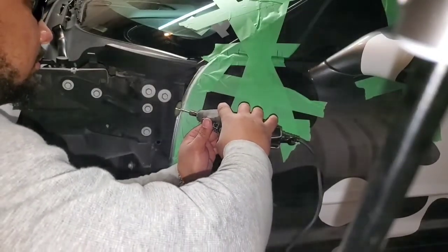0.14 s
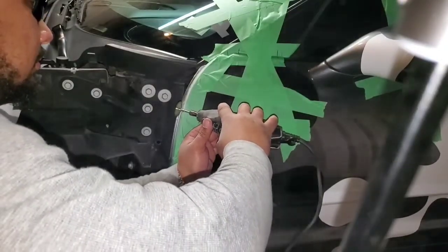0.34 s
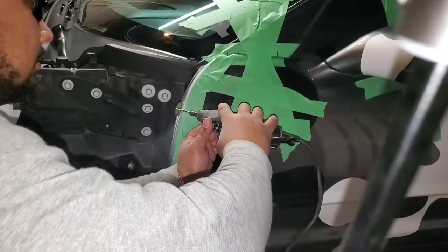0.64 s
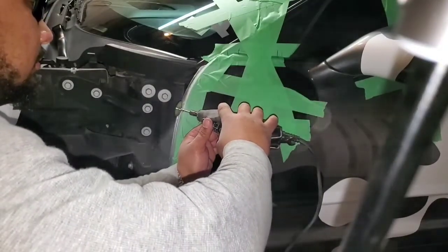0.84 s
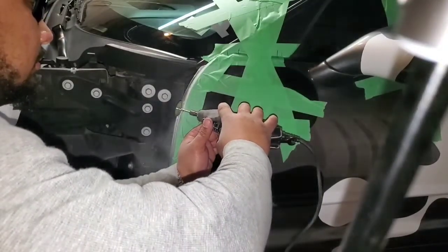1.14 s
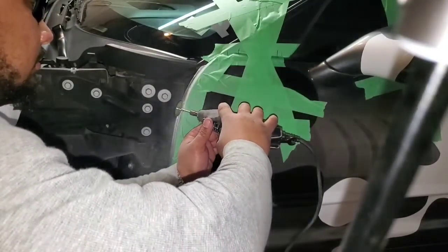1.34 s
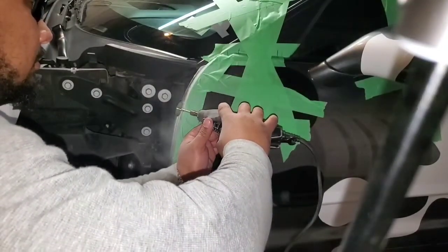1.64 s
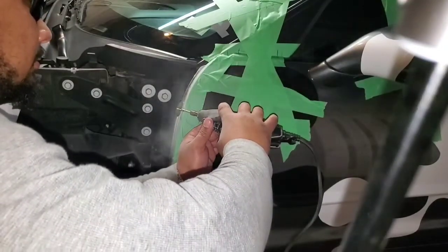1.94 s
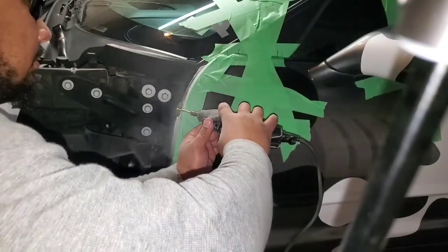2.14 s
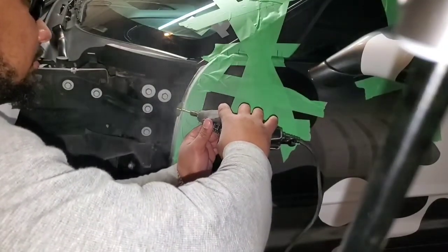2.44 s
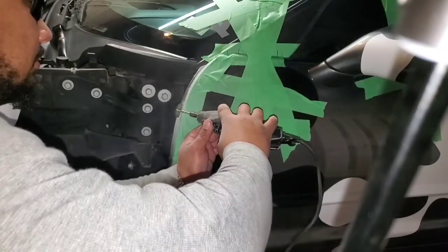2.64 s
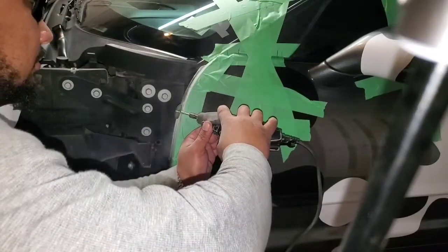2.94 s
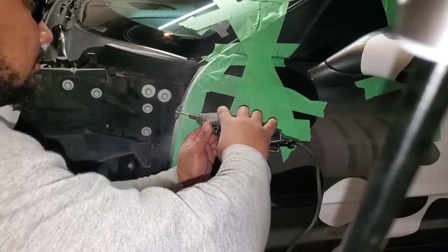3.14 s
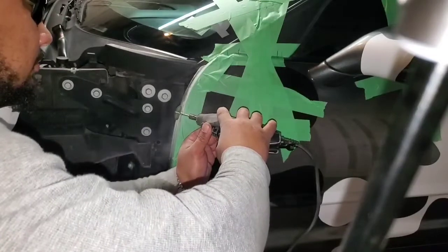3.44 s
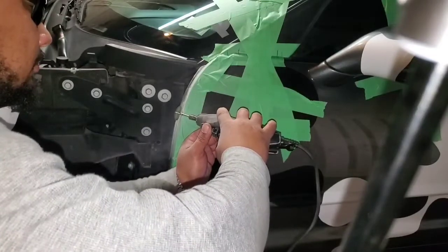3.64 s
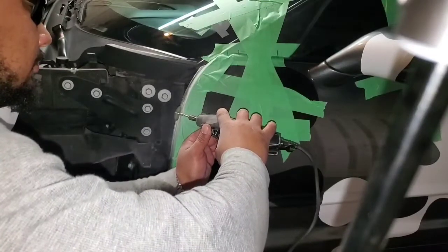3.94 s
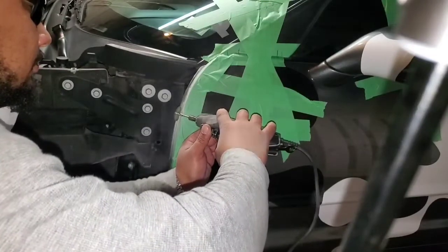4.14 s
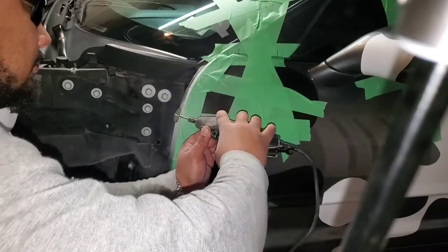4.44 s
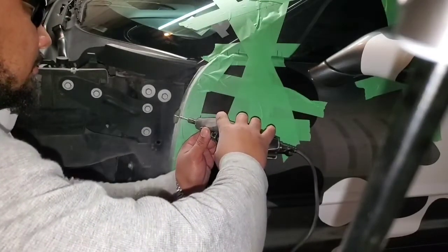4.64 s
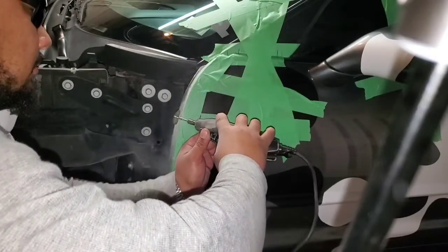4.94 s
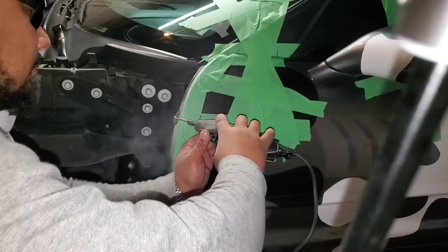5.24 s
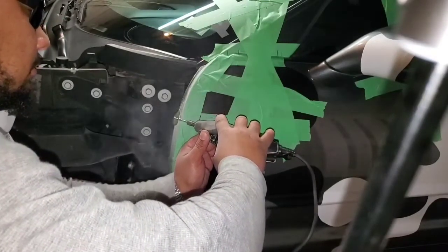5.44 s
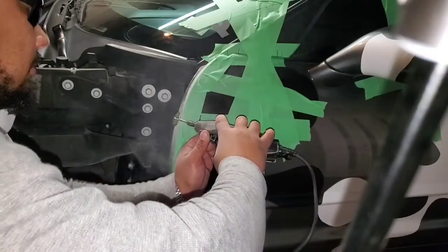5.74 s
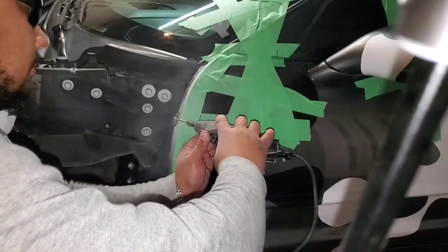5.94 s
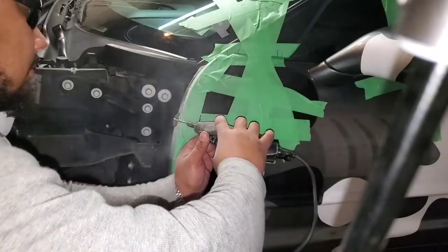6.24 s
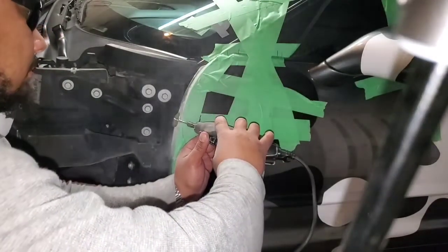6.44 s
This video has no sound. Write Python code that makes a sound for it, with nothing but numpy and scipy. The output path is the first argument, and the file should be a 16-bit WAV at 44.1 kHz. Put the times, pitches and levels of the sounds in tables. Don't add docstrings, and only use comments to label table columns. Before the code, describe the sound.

A corded rotary tool runs throughout, close in a garage, its cutoff disc working a car panel. At 0 s it is fast, a hard buzzing whine with strong rapid knocking that blurs into a rough tone. From about 0.7 s the pitch slides down steeply, and between 1.2 and 2.2 s it is a low, laboured growl with loud bright grit and ringing metal. Around 2.3 s the rasp eases and the pitch climbs, peaking near 2.9 s. At 3.4 s the disc bites again, rasping loudly at the lowest pitch until 4.4 s. It frees and rises near 4.8 s, sags with moderate rasp from 5.1 to 5.7 s, then lightens and rises to about 6.3 s before falling with a last snag at 6.5 s. Steady vent hiss, faint rumble, short reflections and momentary bass losses accompany it.

```python
import sys
import numpy as np
from scipy import signal
from scipy.fft import rfft, irfft, next_fast_len
from scipy.io import wavfile
from scipy.ndimage import uniform_filter1d, minimum_filter1d

SR = 44100
rng = np.random.default_rng(int(sys.argv[2]) if len(sys.argv) > 2 else 0)


def field_ratio(decibels):
    return 10 ** (np.asarray(decibels, dtype=float) / 20)


def to_wav(sig):
    pcm = np.clip(np.atleast_2d(sig), -1, 1) * 32767
    pcm = np.round(pcm).astype(np.int16)
    wavfile.write(sys.argv[1], SR, pcm.T)


N = 290178
MAINS_HZ = 120
USUAL_DB = -28


def unit(x):
    return x / np.sqrt(np.mean(x ** 2) + 1e-20)


def along(points, hz):
    point_hz, value = np.transpose(points)
    return np.interp(np.log(hz + 1), np.log(point_hz + 1), value)


def curve(points):
    point_s, value = np.transpose(points)
    return np.interp(np.arange(N) / SR, point_s, value)


def wobble(rate_hz):
    knots = rng.standard_normal(1000)
    return np.interp(np.arange(N) * rate_hz / SR, np.arange(len(knots)), knots)


def bumps(rows):
    seconds = np.arange(N) / SR
    return sum(size * np.clip(1 - np.abs(seconds - s) / half_s, 0, 1) for s, half_s, size in rows)


def filtered(x, response):
    m = next_fast_len(N + SR // 2)
    return irfft(rfft(x, m) * response(np.fft.rfftfreq(m, 1 / SR)), m)[..., :N]


def above(hz, edge_hz):
    return 1 / np.sqrt(1 + (edge_hz / (hz + 1)) ** 24)


def band(x, lo_hz, hi_hz):
    return unit(filtered(x, lambda hz: above(hz, lo_hz) * np.sqrt(1 - above(hz, hi_hz) ** 2)))


def ringing(modes, hz):
    resonances = 0
    for mode_hz, width_hz, level_db in modes:
        damping = 1j * hz * width_hz
        resonances = resonances + field_ratio(level_db) * damping / (mode_hz ** 2 - hz ** 2 + damping)
    return 1 + np.abs(resonances)


# time_s, speed_hz (turns per second)
SHAFT_SPEED = [(0.0, 500.4), (0.42, 487.8), (0.74, 464.2), (1.3, 320.9), (1.67, 291.6), (2.0, 287.9),
               (2.54, 295.6), (2.87, 332.6), (3.33, 308.6), (3.5, 275.9), (3.86, 262.4), (4.37, 262.3),
               (4.49, 292.3), (4.81, 309.7), (5.21, 275.1), (5.57, 275.8), (6.28, 344.6), (6.58, 272.8)]
# centre_s, half_length_s, speed_change_hz
SHAFT_CATCHES = [
    (.98, .09, -6),
    (1.32, .05, -3),
    (1.65, .07, -3),
    (2.45, .06, 4),
    (2.56, .08, -8),
    (2.72, .07, 4),
    (3.27, .05, -3),
    (6.08, .07, 3.5),
    (6.27, .06, -2),
    (6.42, .08, 2.5),
]


def shaft():
    inertia_s = .26
    return uniform_filter1d(curve(SHAFT_SPEED), int(inertia_s * SR), mode="nearest") + bumps(SHAFT_CATCHES)


def braking(speed):
    smooth = uniform_filter1d(speed, SR // 10, mode="nearest")
    return np.clip(-np.gradient(smooth) * SR / speed, 0, 1)


# start_s, end_s, order, level_db
FAVOURED_ORDERS = [(0.13, .6, 10, 6), (0.083, 0.41, 9, -20), (0.69, 0.78, 6, 3.5), (0.066, .5, 5, -6),
                   (0.67, 0.775, 3, 6), (0.41, 0.43, 4, 4), (0.69, .95, 5, -19), (0.98, 1.13, 13, 9),
                   (1.2, 1.6, 8, -14), (1.72, 1.96, 2, -9.5), (2.6, 3, 6, 8), (3.1, 3.18, 3, -18),
                   (1.9, 3.2, 11, -9), (3.25, 3.5, 9, 8), (3, 3.47, 10, 4.5), (3.25, 3.45, 3, 5.5),
                   (3.45, 3.75, 8, 13), (2.38, 2.54, 8, 4.5), (6.12, 6.35, 8, 5.5), (3.2, 4.6, 6, -4),
                   (6.3, 6.45, 6, 7.5), (3.9, 4.3, 5, -12), (4.64, 5.7, 5, -9.5), (5.1, 5.55, 15, 8),
                   (5.25, 7.7, 13, 5), (4.6, 8.9, 7, 1), (5.05, 6.1, 8, 8), (5.82, 5.98, 8, -4),
                   (5.2, 5.85, 21, 9.5), (6.25, 6.4, 1, 9)]


def favoured(order):
    swell_s = .1
    lift_db = 0
    for start, end, row_order, db in FAVOURED_ORDERS:
        if round(row_order) == order:
            corners = [start - swell_s, start, end, end + swell_s]
            lift_db = lift_db + np.interp(np.arange(N) / SR, corners, [0, db, db, 0])
    return lift_db


# pitch_hz, level_db
SHAKE_ONCE = [(262, -45), (290, -59), (310, -50), (328, -42.5), (350, -50), (400, -35), (455, -32.5),
              (495, -43)]
# pitch_hz, level_db
SHAKE_TWICE = [(530, -46), (600, -45), (660, -44.5), (720, -38.5), (790, -25.5), (930, -29.5), (1000, -26)]
# pitch_hz, level_db
COMMUTATOR = [(2100, -37), (2220, -55), (2330, -36.5), (2420, -30.5), (2660, -28), (2850, -20),
              (3200, -23.5), (3950, -32)]


def motor(speed, turn, ripple):
    once_db = along(SHAKE_ONCE, speed) + favoured(order=1)
    twice_db = along(SHAKE_TWICE, 2 * speed) + favoured(order=2)
    bars_db = along(COMMUTATOR, 8 * speed) + favoured(order=8)
    shake = field_ratio(once_db + 3 + 3 * wobble(25)) * np.sin(turn + .85 * wobble(30))
    shake += field_ratio(twice_db + 3 + 2.5 * wobble(18)) * np.sin(2 * turn + .75 * wobble(55))
    steady = field_ratio(bars_db + 2.23 * wobble(28))
    pulsing = field_ratio(-33.5 + 2.8 * wobble(15)) * ripple
    bars = np.sin(8 * turn + .65 * wobble(60)) * (steady + pulsing)
    return shake, bars


# pitch_hz, level_db (per Hz)
GRIT_COLOUR = [(300, -23.5), (480, -18.5), (620, -17.5), (700, -17.5), (820, -9), (1260, -7.5),
               (2660, -0.5), (3660, -1.5), (4580, -6), (5740, -3.5), (7000, -6.5), (10500, -5),
               (12200, -1.5), (14600, -4.5)]


def gritty(hz):
    return field_ratio(along(GRIT_COLOUR, hz))


def fan(ripple):
    air = rng.standard_normal((2, N)) * field_ratio(ripple + wobble(12))
    return field_ratio(-34) * unit(filtered(air, gritty))


# pitch_hz, level_db (per Hz)
RUMBLE_COLOUR = [(13, -42), (22, -14.5), (49, -8.5), (70, -2), (128, -17), (166, -27), (230, -27.5),
                 (300, -32.5), (510, -120)]
# time_s, level_db
RUMBLE_LEVEL = [(0, -41), (.3, -43), (.5, -43), (.7, -46.5), (1.7, -46.5), (2.4, -52.5), (3.4, -45.5),
                (3.9, -47.5), (4.6, -48.5), (5.1, -49.5), (5.3, -50.5), (5.7, -49), (6.1, -44),
                (6.58, -46.5)]


def rumble():
    common, apart = filtered(rng.standard_normal((2, N)), lambda hz: field_ratio(along(RUMBLE_COLOUR, hz)))
    pair = np.array([common + 0.12 * apart, common - 0.51 * apart])
    return field_ratio(curve(RUMBLE_LEVEL) + 3.2 * wobble(11)) * unit(pair)


# time_s, level_db
HAND_PRESSURE = [(0, -29), (.53, -25), (.85, -27), (1.15, -23), (2.0, -22.5), (2.28, -35), (2.8, -36),
                 (3.3, -32.5), (3.46, -21.5), (4.4, -23.5), (4.57, -35.5), (4.87, -38.5), (5.13, -29.5),
                 (5.5, -27.5), (5.76, -27), (5.86, -39), (6.3, -35.5), (6.58, -30)]
# centre_s, half_length_s, level_db
DISC_JOLTS = [(0.12, 0.043, 6), (0.868, 0.038, -8), (.95, 0.016, 5), (1.06, .03, -3), (2.44, 0.019, 6),
              (2.526, 0.084, -12.5), (2.67, 0.087, 5.5), (3.11, 0.14, -6), (4.344, 0.061, -2),
              (5.5, 0.03, 3.5), (5.685, 0.031, -1.5), (5.771, .04, 2), (6.548, 0.017, 11)]


def pressure():
    return curve(HAND_PRESSURE) + bumps(DISC_JOLTS)


# time_s, level_db
DISC_BLOW = [(0, -20), (.45, -16), (.9, -21.5), (1.13, -24), (1.3, -41), (1.85, -35.5), (2.36, -42.5),
             (2.7, -62), (2.86, -41), (3.3, -26.5), (3.8, -32), (4.4, -29), (4.97, -29), (5.1, -29.5),
             (5.8, -27), (6.12, -33.5), (6.3, -26), (6.58, -30)]


def blow():
    return curve(DISC_BLOW)


# low_hz, middle_hz, high_hz
RASP_EDGES = (2200, 4700, 9000)
# pitch_hz, level_db
KNOCK_COLOUR = [(600, -7), (850, -3.5), (2000, -1), (3400, -4), (4150, -1.5), (5000, -1.5), (6300, 2),
                (7500, -3.5)]
# pitch_hz, width_hz, level_db
PANEL_MODES = [(858, 480, -2), (1325, 254, -7.5), (2040, 390, -7), (2748, 50, 3), (2944, 250, 1),
               (3820, 79, -19), (3870, 73, -6.5), (4820, 47, -2), (5730, 70, -13), (5920, 40, -1.5)]


def knock(speed, turn, ripple, ring_db):
    coarse = 64
    low_db = blow()
    hard_db = low_db - USUAL_DB
    dig_db = 4 * braking(speed)
    middle_db = 2.5 - 0.5 * hard_db
    high_db = -1 - 0.8 * hard_db + 0.35 * (ring_db - USUAL_DB)
    orders = np.zeros(N)
    for k in range(3, 37):
        if k == 8:
            continue
        hz = k * speed[::coarse]
        slow = [above(hz, RASP_EDGES[0]) ** 2, above(hz, RASP_EDGES[1]) ** 2, along(KNOCK_COLOUR, hz)]
        middle, high, colour_db = np.repeat(slow, coarse, axis=1)[:, :N]
        shift_db = middle_db * middle + (high_db - middle_db) * high + dig_db * (k > 4)
        breakup_db = (1.5 + k / 9) * wobble(30)
        level = field_ratio(low_db - 8 + shift_db + favoured(k) + colour_db + breakup_db - k / 7)
        jitter = (.35 + k / 16) * wobble(70)
        orders += level * np.sin(k * (turn + .04 * wobble(40)) + jitter + 2 * np.pi * rng.random())
    orders *= 1 + .06 * ripple
    return filtered(orders, lambda hz: ringing(PANEL_MODES, hz))


# pitch_hz, width_hz, level_db
DISC_MODES = [(4230, 140, -3), (5050, 150, -8), (5700, 70, 3), (5820, 50, 5), (6200, 40, 3), (8800, 60, -8),
              (9380, 70, -2), (11800, 300, -6), (12580, 60, -2), (13400, 300, -4)]


def grind(speed, turn, ripple, ring_db):
    hard_db = blow() - USUAL_DB
    housing_db = np.maximum(-29.5 - 4 * np.arange(N) / SR, -43) + .1 * hard_db
    panel_db = -32.5 + 0.82 * (ring_db - USUAL_DB) + 0.082 * hard_db + 3.5 * braking(speed)
    sizzle_db = 1.5 - 5 * np.log2(speed / 290) - 0.02 * hard_db
    swell_db = 2.5 * np.cos(turn) + ripple / 2 + 1.37 * wobble(70) + 0.85 * wobble(13)
    grit = rng.standard_normal((4, N)) * field_ratio(swell_db)
    grit = filtered(grit, lambda hz: gritty(hz) * ringing(DISC_MODES, hz) ** 1.4)
    low, middle, high = RASP_EDGES
    housing = field_ratio(housing_db) * band(grit, 390, low)
    panel = field_ratio(panel_db) * band(grit, low, middle)
    disc = band(grit, middle, high) + field_ratio(sizzle_db) * band(grit, high, 19000)
    return housing + panel + field_ratio(ring_db + 1) * disc


# pitch_hz, t60_s
GARAGE_DECAY = [(300, 0.89), (2500, 0.19), (12000, 0.068)]
# pitch_hz, phase_rad
LEFT_LEAD = [(400, 0.047), (900, 1.32), (2000, 1.23), (5000, 1.6), (8500, 1.88), (12000, 1.04)]


def garage(x, wet_db):
    hz, t, z = signal.stft(rng.standard_normal((2, SR // 3)), SR, nperseg=256)
    decay = field_ratio(-60 * t / along(GARAGE_DECAY, hz)[:, None])
    tail = signal.istft(z * decay, SR, nperseg=256)[1]
    tail *= field_ratio(wet_db) / np.linalg.norm(tail[0])
    direct = filtered(x, lambda hz: np.exp([[.5j], [-.5j]] * along(LEFT_LEAD, hz)))
    echoes = signal.fftconvolve(x[None], tail, axes=1)[:, :N]
    return unit(direct + echoes) * np.std(x)


def scene():
    speed = shaft()
    ring_db = pressure()
    turn = 2 * np.pi * np.cumsum(speed) / SR
    ripple = np.cos(2 * np.pi * MAINS_HZ * np.arange(N) / SR)
    shake, bars = motor(speed, turn, ripple)
    knocks = knock(speed, turn, ripple, ring_db)
    near, scattered, left, right = grind(speed, turn, ripple, ring_db)
    tones = garage(knocks + bars, wet_db=-5.5) + garage(shake, wet_db=-9)
    noise = .72 * garage(near, wet_db=-3) + .5 * garage(scattered, wet_db=15)
    noise = noise + .45 * np.array([left, right])
    return (tones + noise + fan(ripple)) * field_ratio([[.9], [-.9]]) + rumble()


# start_s, end_s
BASS_GAPS = [(.91, .94), (1.33, 1.41), (1.54, 1.64), (1.71, 2.05), (2.18, 2.22), (3.47, 3.5), (3.66, 3.7),
             (3.86, 3.91), (3.99, 4.29), (4.38, 4.42), (4.83, 4.86), (5.22, 5.38), (5.58, 5.62)]
# start_s, end_s
SHAFT_GAPS = [
    (1.74, 2.14),
    (2.42, 2.46),
    (2.6, 2.71),
    (3.46, 3.65),
    (3.79, 4.15),
    (4.22, 4.29),
    (4.46, 4.5),
    (5.18, 5.22),
    (5.42, 5.58),
    (5.66, 5.74),
]
# start_s, end_s
UPPER_GAPS = [
    (1.25, 1.7),
    (1.72, 2.08),
    (2.58, 2.72),
    (3.3, 3.6),
    (4.5, 4.9),
    (5.3, 5.78),
]


def spectral_gaps(x):
    hz, t, z = signal.stft(x, SR, nperseg=2048)
    pitch = hz[:, None]
    raw = np.sum(np.abs(z) ** 2, axis=0)
    power = uniform_filter1d(raw, size=4, axis=0)
    loudest = -minimum_filter1d(-power, size=27, axis=0)
    mask_db = along([(400, -22), (900, -15), (1900, -13), (2600, -20), (9000, -16)], hz)[:, None]
    z = z * np.where(power < field_ratio(2 * mask_db) * loudest, field_ratio(-16), 1)
    weak = raw < .6 * uniform_filter1d(raw, size=9, axis=0)
    z = z * np.where(weak & (pitch < 2500), .2, 1)
    for lo_hz, hi_hz, gaps, gap_db in [(0, 190, BASS_GAPS, -45), (190, 370, SHAFT_GAPS, -45),
                                       (370, 520, UPPER_GAPS, -25)]:
        lost = sum((t > start - .02) & (t < end + .02) for start, end in gaps) > 0
        z = z * np.where((pitch >= lo_hz) & (pitch < hi_hz) & lost, field_ratio(gap_db), 1)
    thinned = signal.istft(z, SR, nperseg=2048)[1][:, :N]
    return filtered(thinned, lambda hz: hz < 14600)


def band_limit(x):
    return signal.sosfilt(signal.butter(12, 15870, fs=SR, output="sos"), x)


def record(dry):
    rounded = dry / (1 + np.abs(dry / .85) ** 4) ** .25
    mix = spectral_gaps(rounded)
    return band_limit(mix)


dry = scene()
out = record(dry)
to_wav(out)
```